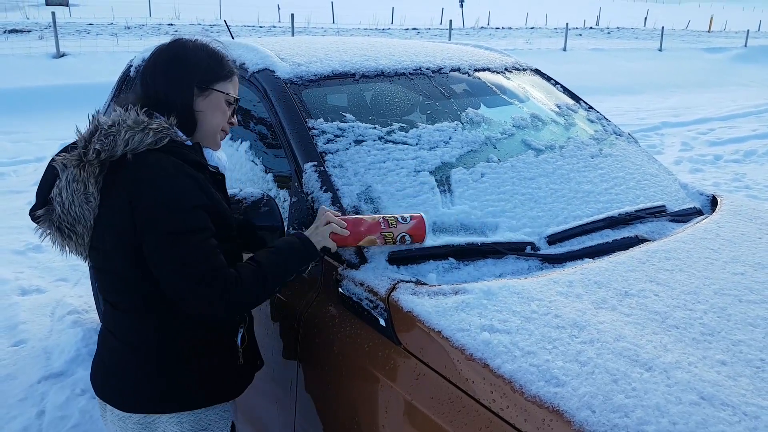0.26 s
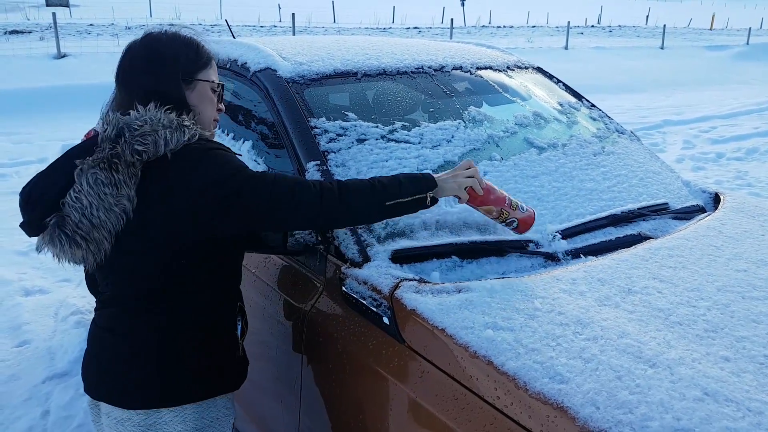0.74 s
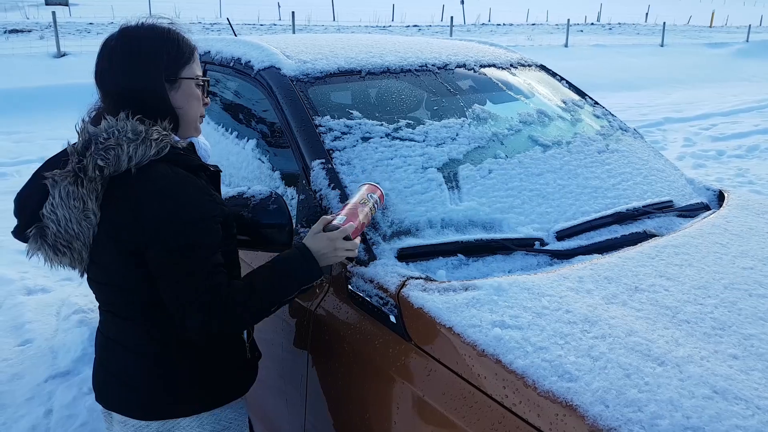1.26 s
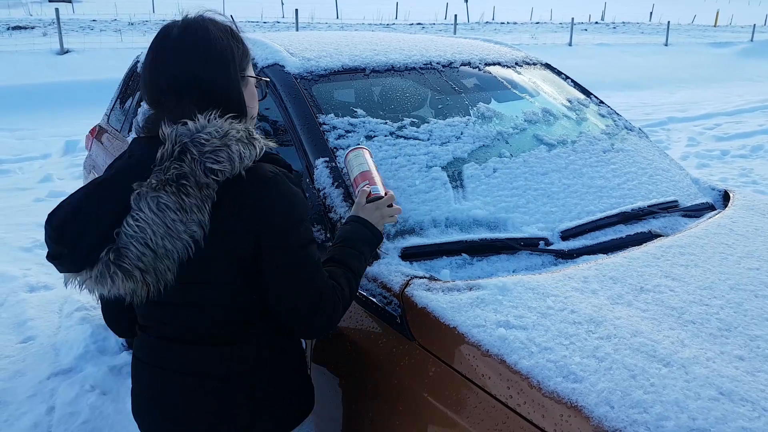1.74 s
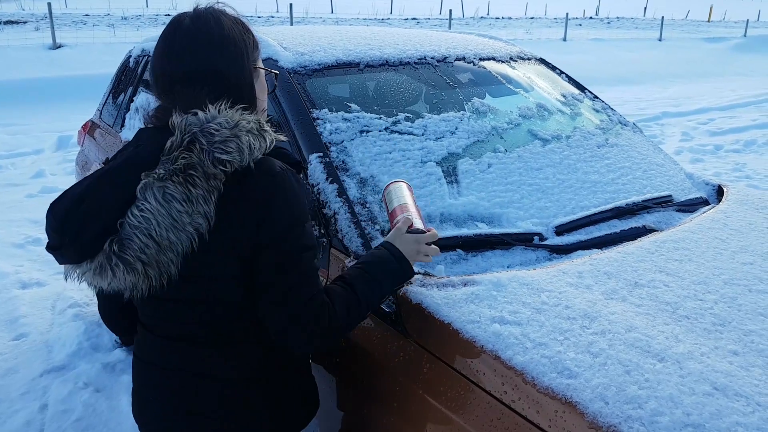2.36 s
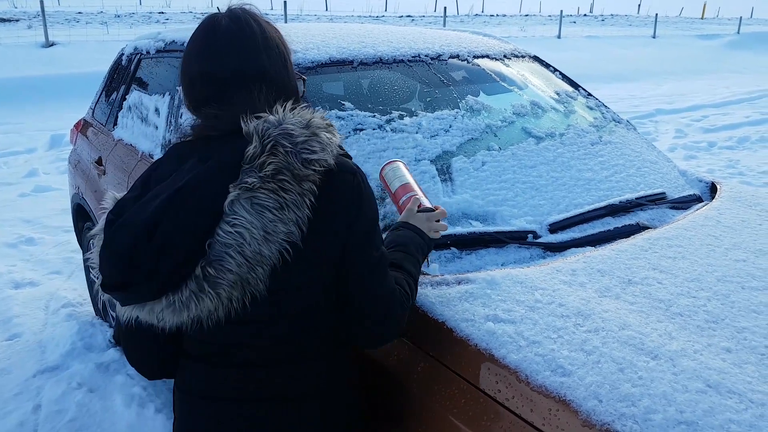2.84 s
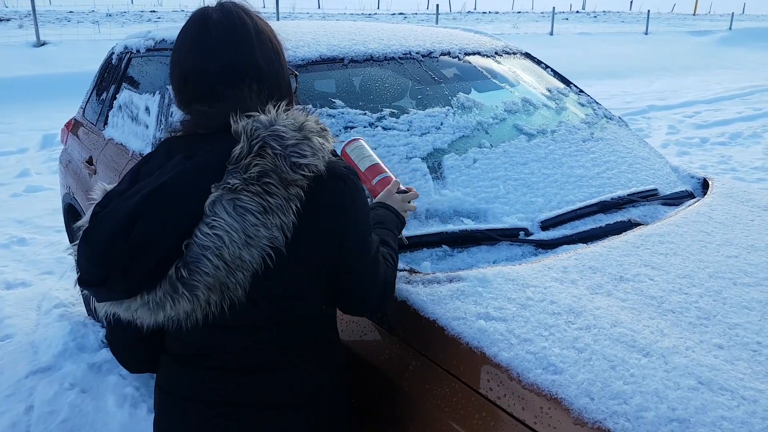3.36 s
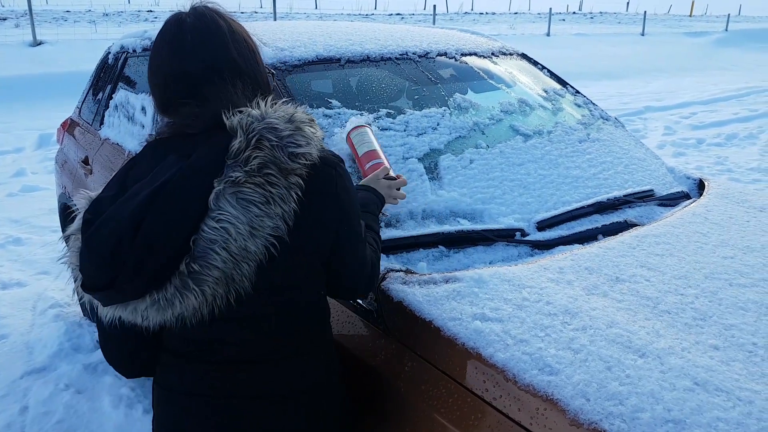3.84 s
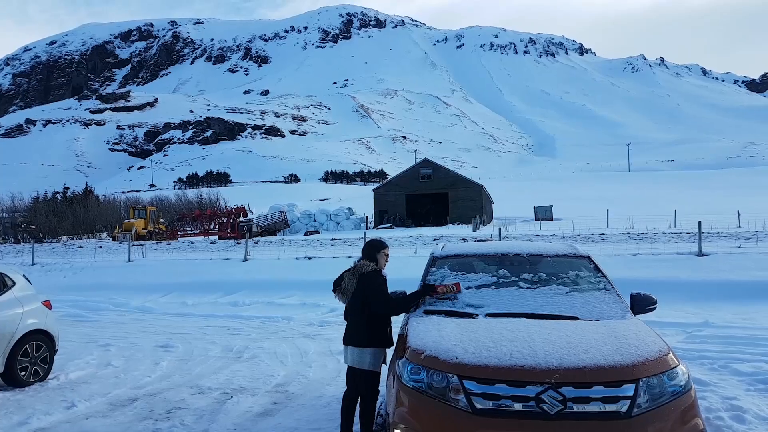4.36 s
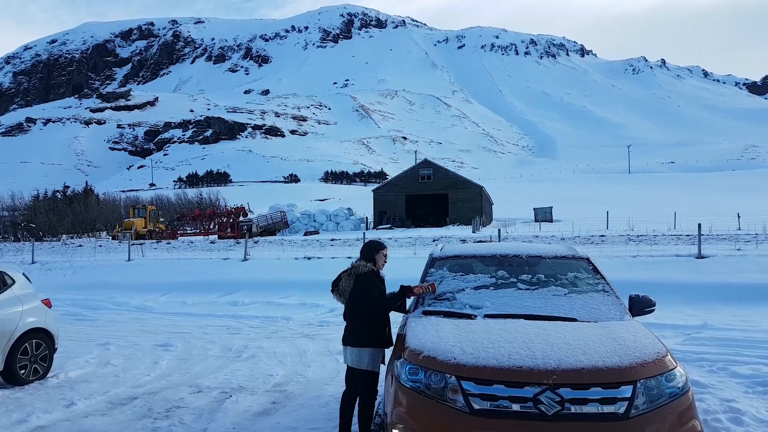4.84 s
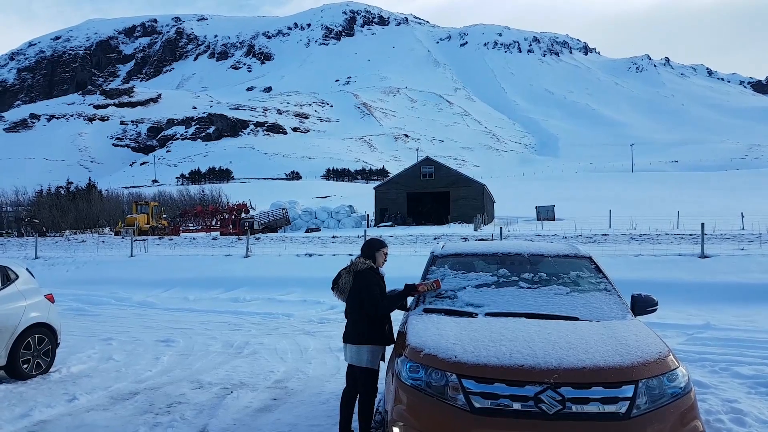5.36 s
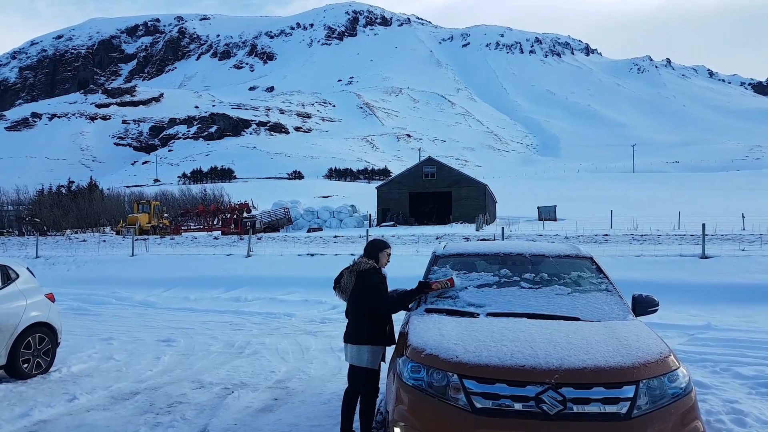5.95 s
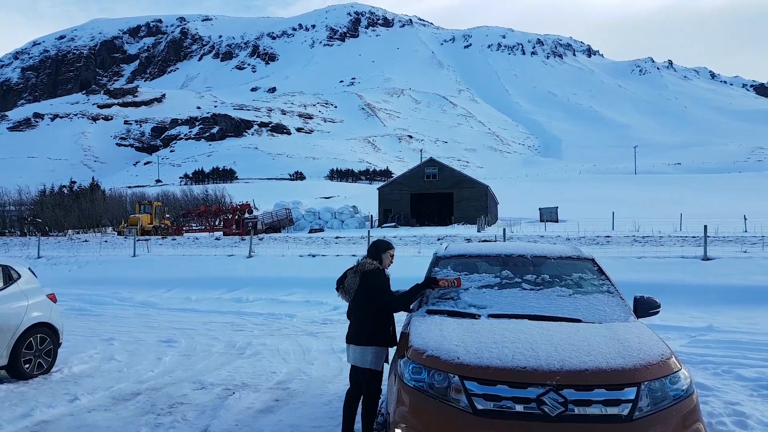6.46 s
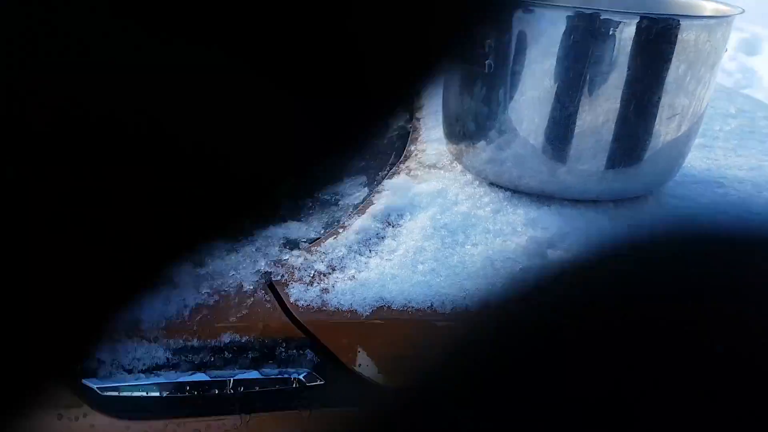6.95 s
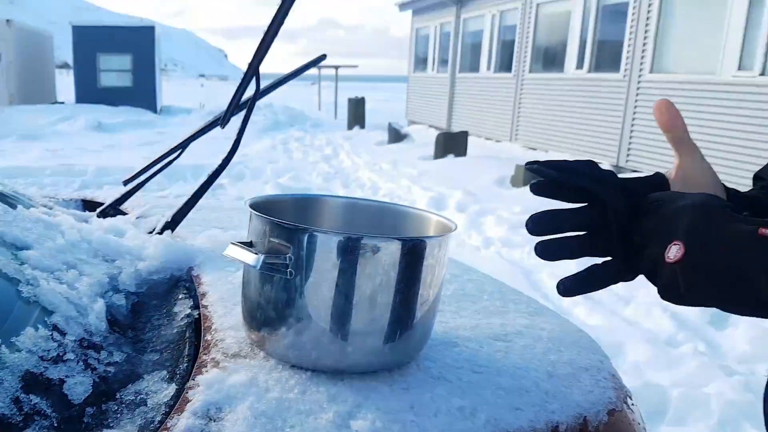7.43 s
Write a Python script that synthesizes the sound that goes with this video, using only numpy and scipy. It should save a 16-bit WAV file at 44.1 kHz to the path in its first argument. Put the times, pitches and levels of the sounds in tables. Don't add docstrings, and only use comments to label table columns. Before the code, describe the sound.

A snowy yard with a low, soft outdoor background; a short wind buffet hits the microphone at the start and dies by about 0.5 s. Very close, a hollow tube's hard rim scrapes frost from a windshield: a crack at 0.1 s, then dense, loud, crunchy strokes from 0.25 to 0.85 s. Further short bursts come around 1.4-1.75, 2.0-2.15, 2.6-2.8, 3.1, 3.5 and 3.9 s, each gritty and juddering with snaps and hissing powder, faint arm rustles between. At 4.1 s the perspective jumps farther away: scraping continues much quieter, in irregular strokes until 6.8 s, over a faint steady engine hum. After an instant of silence at 6.82 s, a handheld microphone beside the engine picks up a solid knock, deep rumble, sleeve rubbing near 6.95 s, and small taps and thumps on the right, ending around 7.7 s.

```python
import sys
import numpy as np
from scipy import signal
from scipy.fft import rfft, irfft, next_fast_len
from scipy.io import wavfile
from scipy.ndimage import uniform_filter1d, map_coordinates

SR = 44100
rng = np.random.default_rng(int(sys.argv[2]) if len(sys.argv) > 2 else 0)


def amplitude_ratio(level_db):
    exponent = np.asarray(level_db, float) / 20
    return 10 ** exponent


def store_pcm(level_fs):
    pcm = np.round(np.clip(level_fs, -1, 1) * 32767).astype(np.int16)
    wavfile.write(sys.argv[1], SR, np.atleast_2d(pcm).T)


N = 339429

CUT_S = 4.1
SILENCE_START_S, SILENCE_END_S = 6.812, 6.823

# frequency in [Hz], density in [dB per Hz].
NEAR_YARD_SPECTRUM = [(15, -27), (25, -3), (49, -2.5), (64, -6.5), (120, 1), (190, 1.5), (560, -7.5),
                      (641, -6.5), (911, -9), (1130, -10), (1790, -10.5), (2910, -19.5), (7110, -34.5),
                      (11600, -36), (16000, -35.5)]
FAR_YARD_SPECTRUM = [(40, -39), (68, -21.5), (112, -4), (145, -10.5), (170, -19.5), (204, -7.5),
                     (293, -21.5), (386, -21.5), (463, -24), (624, -16.5), (699, -26.5), (1740, -27),
                     (2090, -38), (2820, -39.5), (6000, -50), (16000, -90)]
# frequency in [Hz], density in [dB per Hz].
AIR_HISS_SPECTRUM = [(1800, -40), (3000, 5), (5500, -4), (7200, -21), (9000, -6), (13000, -9), (16000, -10)]
# frequency in [Hz], left-right likeness [0-1]; then frequency in [Hz], left minus right in [dB].
YARD_LIKENESS = [(60, 0.84), (180, 1), (550, 0.89), (1650, 0.14), (4970, 0.032), (15000, 0.023)]
YARD_BALANCE = [(60, -2), (240, -1), (950, 0.5), (3770, -0.5), (15000, 6.5)]
# time in [s], firing rate in [Hz], level in [dB].
DISTANT_ENGINE = [
    (0, 40.2, -40),
    (.4, 42.5, -60),
    (4.09, 40.6, -92),
    (4.11, 40.28, -46.5),
    (6.81, 40.3, -45.5),
]
# time in [s], level in [dB].
WIND_GUST = [
    (0, -26),
    (.1, -36),
    (.3, -36),
    (.55, -53),
]
# frequency in [Hz], density in [dB per Hz].
WIND_SPECTRUM = [(18, -32), (30, 3.5), (123, 10.5), (312, -6), (351, -34), (429, -40), (500, -13),
                 (650, -33), (1100, -120)]
# time in [s], level in [dB], rise in [s], hold in [s], fall in [s].
ARM_SWISHES = [
    (.01, -63, .01, .001, 0.9),
    (1.25, -58, 0.25, 0.087, 1.7),
    (2.92, -53.5, 0.93, 0.11, 0.81),
    (3.8, -61, 0.44, 0.00095, 0.53),
]

# time of full pressure in [s], shell level in [dB],
# rise in [s], hold in [s], fall in [s].
NEAR_STROKES = [(.243, -13, 0.0014, .02, 0.013), (.388, -16, 0.02, 0.05, 0.14),
                (.468, -18, 0.004, 0.085, 0.03), (.59, -15.5, 0.084, 0.062, 0.015),
                (.66, -19, .004, 0.07, 0.034), (.755, -23, 0.015, 0.0088, 0.019),
                (.802, -20, 0.02, 0.00078, 0.0065), (.843, -32, 0.04, .001, 0.045),
                (1.284, -44.5, 0.14, .001, .17), (1.435, -20.5, 0.0071, 0.067, 0.024),
                (1.64, -28, 0.032, 0.01, 0.014), (1.7, -15.5, 0.025, 0.026, 0.026),
                (1.742, -17.5, 0.0048, 0.034, 0.037), (2.04, -20, 0.077, 0.023, 0.011),
                (2.095, -18.5, 0.081, 0.028, 0.057), (2.158, -22, 0.033, 0.00092, 0.012),
                (2.604, -15, 0.016, 0.072, 0.063), (2.757, -34.5, .003, 0.025, 0.077),
                (3.074, -20.5, 0.027, .001, 0.16), (3.09, -34, 0.011, 0.027, .008),
                (3.507, -24, 0.0011, 0.016, 0.081), (3.577, -21, 0.0012, 0.0068, 0.01),
                (3.832, -37.5, 0.0027, 0.051, 0.038), (3.9, -17, 0.061, 0.028, 0.07),
                (3.977, -17.5, 0.026, 0.02, 0.026)]
FAR_STROKES = [(4.11, -37.5, 0.012, .001, 0.06), (4.147, -38, 0.0065, 0.054, 0.012),
               (4.326, -30, 0.1, .001, .2), (4.468, -38.5, 0.06, 0.071, 0.027),
               (4.59, -37.5, 0.085, .001, 0.065), (4.61, -48, 0.016, 0.03, .01),
               (5.05, -41, 0.13, .001, 0.019), (5.077, -28.5, 0.04, .001, 0.047),
               (5.142, -34.5, 0.094, .001, 0.036), (5.682, -29, 0.054, .001, 0.04),
               (5.73, -27.5, 0.034, .001, 0.059), (6.03, -33.5, 0.1, 0.027, 0.056),
               (6.3, -43, 0.38, .021, 0.023), (6.352, -25.5, 0.035, .001, 0.098),
               (6.4, -52, .021, .001, 0.16), (6.56, -51, 0.049, 0.064, .03),
               (6.64, -40.5, 0.043, 0.15, .03)]
# time in [s], peak in [dB], rim relative to shell in [dB].
NEAR_BREAKS = [(0.12, -1.5, -7.5), (0.161, -17, -16.5), (0.25, -5.5, -9.5), (0.362, 1, -9.5),
               (0.379, -4.5, -20), (0.662, -6, -12), (1.415, 2, -21), (1.449, -2, -5), (1.616, -7, -7.5),
               (1.744, -10.5, 2), (1.966, -3.5, -17), (2.069, -1, -18), (2.15, -1, -22),
               (2.403, -17.5, -22.5), (2.757, -1, -11.5), (3.075, -3.5, -9), (3.209, -18, -18),
               (3.242, -17, -22), (3.508, -1, -9), (3.532, -2, -17), (3.54, -4, -5), (3.575, -9, -4),
               (3.832, -15, -14), (3.911, -1, -19), (3.976, -6, -11), (4.042, -11.5, -19)]
FAR_BREAKS = [(4.11, -36, 9), (4.156, -21, 4), (4.216, -15, -11), (4.317, -20, 2), (4.462, -18, -6),
              (4.521, -23, -2), (4.583, -26.5, -4), (4.708, -41, 1.5), (4.932, -11, -17.5),
              (5.059, -16.5, -9), (5.142, -17, -22), (5.68, -13.5, -14), (5.727, -19, 0), (5.819, -30, -9),
              (5.846, -28.5, -8), (5.895, -26.5, -20), (6.003, -12.5, -9), (6.294, -36, 13),
              (6.349, -22.5, -10), (6.41, -14.5, -3), (6.452, -19.5, -17), (6.531, -22, -6),
              (6.565, -19.5, -25), (6.58, -13.5, -16), (6.596, -16, -6), (6.624, -12, -8), (6.633, -15, -8)]
# time in [s], peak in [dB], rim gain in [dB].
NEAR_RIDGES = [(0.3574, -4.5, -12.5), (0.396, -12.5, -2), (0.4043, -3, 0.5), (0.4154, 0.5, -1),
               (0.4369, -2.5, -0.5), (0.4677, -12.5, 2), (0.476, -12.5, -5), (0.5102, -0.5, -2.5),
               (0.533, -6.5, -2), (0.556, -5, -10), (0.5965, -13, 1), (0.6018, -6, 2), (0.619, -11.5, -2),
               (0.622, -5, 7.5), (0.6384, -11, 14), (0.686, -7.5, 6.5), (0.7315, -18.5, -4),
               (0.7531, -4.5, 0.5), (0.79, -28, 7.5), (0.833, -26, -2.5), (0.8443, -33.5, 4.5),
               (0.851, -29, 0), (1.4394, -11, -6), (1.4583, -3, 2), (1.489, -8, 6), (1.4994, -16.5, 8),
               (1.6478, -20, 0), (1.6755, -10.5, 4), (1.6807, -6, 10.5), (1.7, -15, -7), (1.7054, -12.5, 5),
               (1.72, -2, -5), (1.772, -11.5, -1), (2.0207, -5.5, 5), (2.0453, -27.5, -4),
               (2.0564, -24, -9), (2.0688, -4, -4.5), (2.0716, -15, -7), (2.09, -12, 4), (2.1099, -3.5, -2),
               (2.1166, -21, -4), (2.133, -10, 1), (2.1428, -9, -1.5), (2.148, -10, -13), (2.603, -14, 10),
               (2.618, 0, 0), (2.6242, -1.5, -6), (2.6401, -6.5, -1), (2.664, -10, -22), (2.6884, -8, 0),
               (2.7054, -15, 8), (2.7406, -13.5, 5.5), (2.7697, -17, 6), (3.1494, -23, 0),
               (3.5589, -10.5, -2.5), (3.5864, -11, -2.5), (3.878, -11, 6), (3.8921, -10.5, -15),
               (3.9297, -6.5, 2), (3.9842, -16, 1)]
FAR_RIDGES = [(4.1033, -25, 6), (4.1505, -36, 7), (4.1975, -27, -2), (4.2575, -24, -3), (4.2872, -25.5, 3),
              (4.3355, -25, -4), (4.369, -28, 0), (4.4278, -28, 3), (4.513, -28, -8), (5.0624, -20, 0),
              (5.1223, -32, 3), (5.1287, -28.5, 7), (5.4974, -26, -15), (5.6365, -32, 0), (5.65, -26, 0),
              (5.8681, -33, -5), (5.9856, -39, 2), (6.0272, -22, 6), (6.0447, -16.5, -10),
              (6.2302, -45, 10), (6.3257, -27, 0), (6.336, -16, 1), (6.3584, -20.5, -9), (6.554, -29, -8),
              (6.763, -29, -5)]
# time in [s], flatness on the glass as air column over upper shell in [dB],
# bite of the edge as rim over shell in [dB], lower over upper rim in [dB].
NEAR_HOLD = [(.12, -11, -19.5, -7.5), (.25, -16, -16.5, 0), (.4, -7, -13.5, 0.5), (.5, -6, -12.5, 1.5),
             (.6, -5.5, -10.5, 1), (.72, -1, -8, 8), (.85, 1.5, -14, 2.5), (1.46, -8, -11.5, -5.5),
             (1.62, -8.5, -20.5, 1.5), (1.72, -11, -12, -2), (1.78, -11, -9.5, -3), (2.1, -17.5, -11, -1.5),
             (2.62, -13, -11, -3), (2.7, -7, -12, -9.5), (2.77, -9.5, -5.5, -10), (3.1, -5, -12.5, -7.5),
             (3.54, -10, -2, -6), (3.9, -12.5, -7.5, -8), (4.04, -6.5, -9.5, -3)]
FAR_HOLD = [
    (4.15, 3, -1, -2.5),
    (4.35, 1.5, -8, -3),
    (4.58, 0, -7, 0.5),
    (4.93, -11, -12, -12),
    (5.1, -0.5, -9, -2),
    (5.7, -4.5, -8, -2),
    (6.03, -1, -6, -1),
    (6.36, -1, -5.5, -0.5),
    (6.6, -10.5, -5, -2),
    (6.72, -11, -5.5, -9),
]
# frequency in [Hz], width in [Hz], level in [dB].
NEAR_RESONANCES = [
    [(528, 115, 0.5), (622, 75, 2)],
    [(884, 114, 2.5), (1244, 24, -6)],
    [(1316, 130, -0.5), (1585, 220, 2.5), (1835, 177, 3.5), (2180, 170, -1), (2303, 280, -5.5)],
    [(2730, 190, -3), (3470, 95, -0.5), (3830, 194, 0.5)],
    [(4230, 430, -3), (4630, 390, 0.5), (5055, 230, 1.7), (5800, 260, -2)],
]
FAR_RESONANCES = [
    [(524, 38, 5.5), (665, 64, -3.5)],
    [(859, 60, 1.5), (1230, 116, -8)],
    [(1395, 190, 3.5), (1720, 135, -1), (1960, 100, -2)],
    [(2840, 630, 1), (3860, 280, 2)],
    [(4160, 300, 8.5), (5060, 550, -1), (5390, 170, 0.5), (6330, 860, -10.5)],
]
# frequency in [Hz], density in [dB per Hz].
NEAR_POWDER_SPECTRUM = [(3820, -0.5), (6500, 3.5), (6960, -51), (7530, 2.5), (9800, 5.5), (13500, -2),
                        (15100, -3.5), (16000, -19.5)]
FAR_POWDER_SPECTRUM = [(3820, -6), (6300, -4), (7300, -30), (8200, 5), (9300, 4.5), (11500, -1.5),
                       (15100, -5), (16000, -23)]
# frequency in [Hz], left-right likeness [0-1].
NEAR_LIKENESS = [(60, 0.5), (180, 1), (550, 0.97), (1650, 1), (2600, 0.51), (4200, 0.5), (7000, 0.99),
                 (15000, 0.14)]
FAR_LIKENESS = [(60, 0.98), (180, 0.47), (550, 1), (1650, 0.35), (4970, 0.26), (15000, 0.097)]
# frequency in [Hz], left minus right in [dB].
NEAR_BALANCE = [(60, 7), (150, -24), (380, -3.5), (950, 0.5), (2380, -3.5), (5980, 0), (15000, 5.5)]
FAR_BALANCE = [(60, -6), (150, -9), (380, -6), (950, 4), (2380, -0.5), (5980, -3.5), (15000, 4.5)]

# time in [s], level in [dB].
ENGINE_CLOSENESS = [
    (6.823, -27),
    (6.95, -30),
    (7.18, -30.5),
    (7.38, -32),
    (7.6, -30.5),
    (7.7, -31),
]
# frequency in [Hz], density in [dB per Hz].
RUMBLE_SPECTRUM = [(26, -40), (45, -14), (65, -28), (81, -3.5), (178, 3), (218, -1.5), (249, -11),
                   (311, -18), (330, -26), (430, -47), (730, -120)]
PANEL_SPECTRUM = [(180, -37), (300, -8.5), (378, -2), (849, -6), (917, -10), (1640, -12), (3000, -23.5),
                  (3900, -31), (6600, -120)]
# frequency in [Hz], density in [dB per Hz].
RUB_SPECTRUM = [(1650, -10), (2800, -11.5), (4650, -12), (5180, -14), (7500, -20), (9750, -30),
                (16500, -120)]
RUSTLE_SPECTRUM = [(4240, -42), (7200, -12), (8770, 7.5), (10600, 8), (14200, 5), (16000, -1.5)]
# frequency in [Hz], left-right likeness [0-1].
RUMBLE_LIKENESS = [(100, 0.94)]
# frequency in [Hz], left-right likeness [0-1]; then frequency in [Hz], left minus right in [dB].
HELD_LIKENESS = [(60, 0.92), (180, 0.81), (550, 0.43), (1650, 0.021), (4970, 0.021), (15000, 0.01)]
HELD_BALANCE = [(60, 5), (180, -3), (550, -2), (1650, -3.5), (4970, 5), (15000, 7)]
# frequency in [Hz], level in [dB rms], left lead and right lag in [radians].
CLOSE_TONES = [
    (35.2, -36.5, 0.12),
    (59.5, -36.5, .2),
]
# time in [s], peak in [dB], frequency in [Hz], 60 dB decay in [s].
HOUSING_KNOCKS = [
    (6.824, -16, 320, 0.024),
    (6.836, -1.5, 126, 0.021),
    (7.315, -8, 592.5, 0.005),
    (7.417, -4, 700, 0.0027),
    (7.592, -1.5, 192, 0.014),
]
# time in [s], peak in [dB].
FINGER_THUMPS = [
    (6.974, -14),
    (7.061, -29),
    (7.235, -21),
    (7.313, -20),
    (7.35, -24),
    (7.419, -13),
    (7.531, -17),
    (7.566, -11),
]
# time in [s], level in [dB], rise in [s], hold in [s], fall in [s].
SLEEVE_MOVES = [
    (6.824, -35.5, .001, .001, 0.084),
    (6.96, -31, 0.066, 0.00093, 0.089),
    (7.04, -54, .05, 0.026, 0.027),
    (7.165, -56.5, .03, .04, .08),
    (7.26, -54, .06, 0.0097, 0.024),
    (7.6, -56, 0.31, .03, .3),
    (7.697, -52, .015, .01, .01),
]


def unit(x):
    return x / np.sqrt(np.mean(x ** 2) + 1e-20)


def along(points, hz):
    f, v = np.transpose(points)
    return np.interp(np.log(hz + 1), np.log(f + 1), v)


def curves(rows, silent=-120):
    s, first, *others = np.transpose(rows)
    t = np.arange(N) / SR
    return [np.interp(t, s, first, silent, silent)] + [np.interp(t, s, column) for column in others]


def wobble(rate):
    knots = rng.standard_normal(int(N * rate / SR) + 4)
    return map_coordinates(knots, [np.arange(N) * rate / SR])


def swells(rows):
    t = np.arange(N) / SR
    total = np.zeros(N)
    for s, db, rise, hold, fall in rows:
        away = np.maximum((s - t) / rise, (t - s - hold) / fall)
        total += amplitude_ratio(db - 25 * np.clip(away, 0, 5))
    return total


def filtered(x, response):
    m = next_fast_len(N + 8192)
    return irfft(rfft(x, m) * response(np.fft.rfftfreq(m, 1 / SR)), m)[..., :N]


def rush(spectrum, patchy_db):
    z = signal.stft(rng.standard_normal((2, N)), nperseg=512)[2]
    field = uniform_filter1d(rng.standard_normal(z.shape[1:]), size=6, axis=0)
    field = uniform_filter1d(field, size=10, axis=1)
    pair = signal.istft(z * amplitude_ratio(patchy_db * unit(field)), nperseg=512)[1][:, :N]
    return unit(filtered(pair, lambda hz: amplitude_ratio(along(spectrum, hz))))


def ports(pair, likeness, balance, lead_us=0):
    def blend(hz):
        angle = np.arccos(np.clip(along(likeness, hz), -1, 1)) / 2
        return np.array([np.cos(angle), np.sin(angle)])

    def left_over_right(hz):
        ratio = amplitude_ratio(along(balance, hz)) * np.exp(2j * np.pi * hz * lead_us / 10 ** 6)
        return ratio ** np.array([[.5], [-.5]])

    mid, side = filtered(pair, blend)
    return filtered(np.array([mid + side, mid - side]), left_over_right)


def wind():
    gust = amplitude_ratio(curves(WIND_GUST)[0]) * rush(WIND_SPECTRUM, patchy_db=.8)
    return ports(gust, [(100, 0.21)], [(100, -4.0)])


def distant_engine():
    hz, db = curves(DISTANT_ENGINE, silent=45)
    phase = 2 * np.pi * np.cumsum(hz + .2 * wobble(2)) / SR
    return np.sqrt(2) * amplitude_ratio(db + .6 * wobble(3)) * (np.sin(phase) + .3 * np.sin(5 * phase))


def yard():
    t = np.arange(N) / SR
    near = amplitude_ratio(-40 + .7 * wobble(3)) * rush(NEAR_YARD_SPECTRUM, patchy_db=1.2)
    near += swells(ARM_SWISHES) * rush(RUSTLE_SPECTRUM, patchy_db=1.5)
    far = amplitude_ratio(-42.5 + .4 * wobble(3)) * rush(FAR_YARD_SPECTRUM, patchy_db=1.5)
    far += amplitude_ratio(-65) * rush(AIR_HISS_SPECTRUM, patchy_db=0.5)
    background = ports(np.where(t < CUT_S, near, far), YARD_LIKENESS, YARD_BALANCE)
    return background + wind() + distant_engine()


def rim_force(strokes, slips, ridges, bite_db, snap_db, slip_db, slip_t60, judder_db):
    shell, rim, shell_snap, rim_snap = np.zeros((4, N + SR))
    shell[:N] = swells(strokes) * amplitude_ratio(judder_db * (wobble(200) - 2))
    rim[:N] = shell[:N] * amplitude_ratio(bite_db)
    t = np.arange(SR // 20) / SR
    for s, db, rim_db in slips:
        at = round(s * SR)
        decay_db = slip_db + db - 60 * t / slip_t60
        shell[at:][:len(t)] += amplitude_ratio(decay_db)
        rim[at:][:len(t)] += amplitude_ratio(decay_db + rim_db)
        shell_snap[at] = amplitude_ratio(snap_db + db)
        rim_snap[at] = amplitude_ratio(snap_db + db + rim_db)

    peak_delay_s, rise_t60, fall_t60 = 0.001207, 0.0043, 0.014
    u = t - .01
    bump = amplitude_ratio(-12 - 60 * np.maximum(-u / rise_t60, u / fall_t60))
    for s, db, rim_db in ridges:
        at = round((s + peak_delay_s + u[0]) * SR)
        shell[at:][:len(t)] += amplitude_ratio(db) * bump
        rim[at:][:len(t)] += amplitude_ratio(db + rim_db + bite_db[at]) * bump
        shell_snap[round((s + peak_delay_s) * SR)] += amplitude_ratio(snap_db - 5.5 + db)
    return shell[:N], rim[:N], shell_snap[:N], rim_snap[:N]


def resonant(x, modes, shift_db):
    power = sum(amplitude_ratio(db) ** 2 * np.pi * width / SR for hz, width, db in modes)
    total = 0
    for k, (hz, width, db) in enumerate(modes):
        b, a = signal.iirpeak(hz, hz / width, SR)
        total = total + (-1) ** k * signal.lfilter(b, a, x * amplitude_ratio(db + shift_db * wobble(25)))
    return total / np.sqrt(power)


def tube(strokes, slips, ridges, grip, parts, dust, snap_db, slip_db, slip_t60, judder_db, grain_db, low_hz):
    when, *held = np.transpose(grip)
    flat_db, bite_db, lower_rim_db = (np.interp(np.arange(N) / SR, when, db) for db in held)
    shell, rim, shell_snap, rim_snap = rim_force(
        strokes, slips, ridges, bite_db, snap_db, slip_db, slip_t60, judder_db)
    air, lower_rim = amplitude_ratio(flat_db), amplitude_ratio(lower_rim_db)
    lower_shell = amplitude_ratio(-1.5 + 0.51 * flat_db)

    def spread(on_shell, on_rim):
        each = [air * on_shell, lower_shell * on_shell, on_shell, lower_rim * on_rim, on_rim]
        return np.array(each)[:, None]

    grains = unit(amplitude_ratio(grain_db * rng.exponential(size=N)))
    chips = unit((rng.random(N) < 500 / SR) * rng.normal(size=N))
    texture = .8 * grains * rng.standard_normal((5, 2, N)) + .6 * chips
    force = spread(shell, rim) * texture + spread(shell_snap, rim_snap)
    body = sum(resonant(f, modes, shift_db=2.6) for f, modes in zip(force, parts))
    no_bass = signal.butter(4, low_hz, "high", fs=SR, output="sos")
    body = signal.sosfilt(no_bass, body)

    powder_gain = amplitude_ratio(-11.5 - 0.48 * bite_db)
    airborne = uniform_filter1d(rim, round(0.0021 * SR))
    powder = powder_gain * airborne * rush(dust, patchy_db=4.0)
    return body + powder


def scraping():
    near = tube(NEAR_STROKES, NEAR_BREAKS, NEAR_RIDGES, NEAR_HOLD, NEAR_RESONANCES, NEAR_POWDER_SPECTRUM,
                snap_db=6, slip_db=-15.0, slip_t60=0.025, judder_db=2.0, grain_db=3.5, low_hz=389)
    far = tube(FAR_STROKES, FAR_BREAKS, FAR_RIDGES, FAR_HOLD, FAR_RESONANCES, FAR_POWDER_SPECTRUM,
               snap_db=0, slip_db=-16.5, slip_t60=0.035, judder_db=1.82, grain_db=3, low_hz=430)
    near = ports(near, NEAR_LIKENESS, NEAR_BALANCE, lead_us=38.3)
    return near + ports(far, FAR_LIKENESS, FAR_BALANCE)


def engine_tones():
    total = np.zeros((2, N))
    for hz, db, lead in CLOSE_TONES:
        phase = 2 * np.pi * np.cumsum(hz + .5 * wobble(4)) / SR
        total += np.sqrt(2) * amplitude_ratio(db + wobble(4)) * np.sin(phase + [[lead], [-lead]])
    return total * amplitude_ratio([[-1.5], [1.2]])


def sleeve():
    moves, rest_db = swells(SLEEVE_MOVES), -59
    rub = (moves + amplitude_ratio(rest_db)) * rush(RUB_SPECTRUM, patchy_db=1.2)
    rustle = (amplitude_ratio(-1.8) * moves + amplitude_ratio(rest_db - 7)) * rush(RUSTLE_SPECTRUM, patchy_db=1.2)
    return rub + rustle


def housing_knocks():
    t = np.arange(N) / SR
    thumps = [(s, db, 105, .05) for s, db in FINGER_THUMPS]
    total = np.zeros(N)
    for s, db, hz, t60 in list(HOUSING_KNOCKS) + thumps:
        u = np.maximum(t - s, 0)
        onset = 1 - np.exp(-u / 0.00023)
        total -= amplitude_ratio(db - 60 * u / t60) * np.sin(2 * np.pi * hz * u) * onset
    return total * amplitude_ratio([[-28], [0]])


def handling():
    closeness_db = curves(ENGINE_CLOSENESS)[0]
    rumble = amplitude_ratio(closeness_db + 1.6 * wobble(18)) * rush(RUMBLE_SPECTRUM, patchy_db=0.7)
    panels = amplitude_ratio(closeness_db - 8 + .8 * wobble(11)) * rush(PANEL_SPECTRUM, patchy_db=1.2)
    rumble = ports(rumble, RUMBLE_LIKENESS, HELD_BALANCE)
    around = ports(panels + sleeve(), HELD_LIKENESS, HELD_BALANCE)
    return rumble + around + engine_tones() + housing_knocks()


def scene():
    t = np.arange(N) / SR
    outdoors = (yard() + scraping()) * (t < SILENCE_START_S)
    return outdoors + handling() * (t > SILENCE_END_S)


def roll_off(x):
    return signal.sosfilt(signal.butter(12, 16770, fs=SR, output="sos"), x)


def record(dry):
    limited = dry / (1 + abs(dry / .85) ** 4) ** (1 / 4)
    edge_hz, edge_db = [15700, 15900, 16400, 16480, 16800], [0, -22, -30, -48, -52]
    narrow = filtered(limited, lambda hz: amplitude_ratio(np.interp(hz, edge_hz, edge_db)))
    return roll_off(narrow)


dry = scene()
out = record(dry)
store_pcm(out)
```